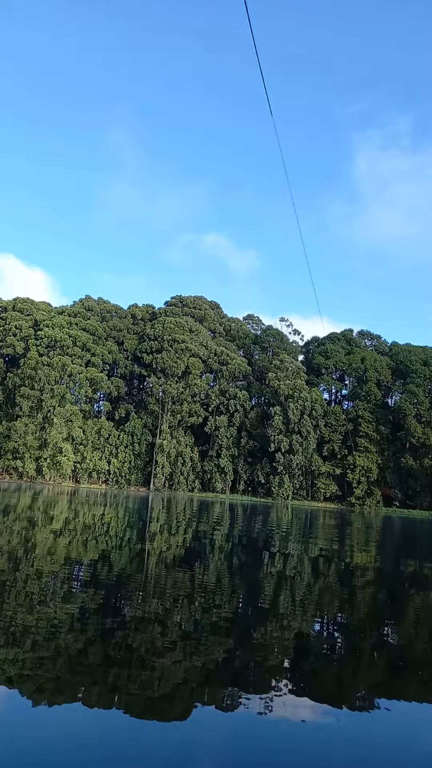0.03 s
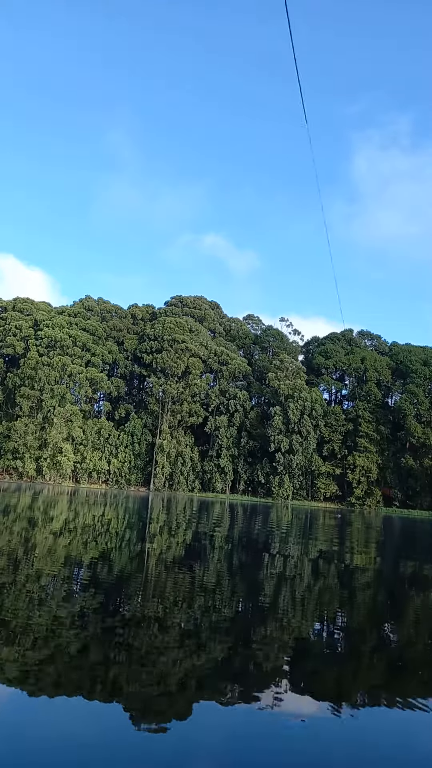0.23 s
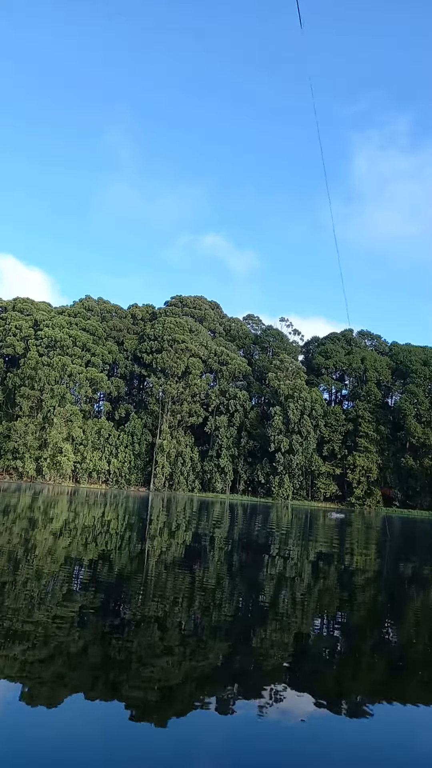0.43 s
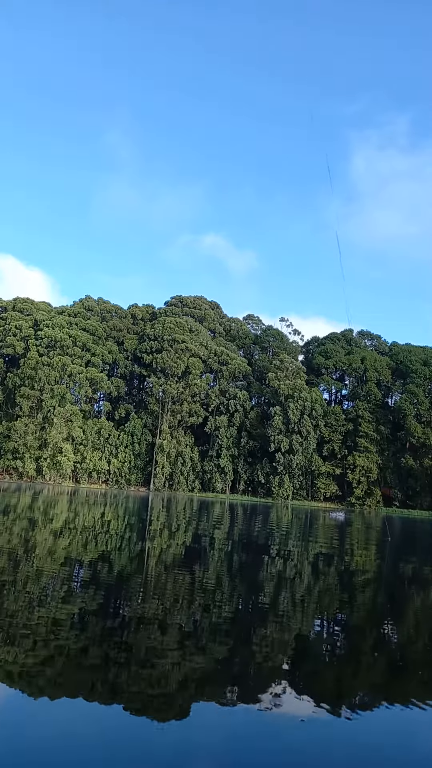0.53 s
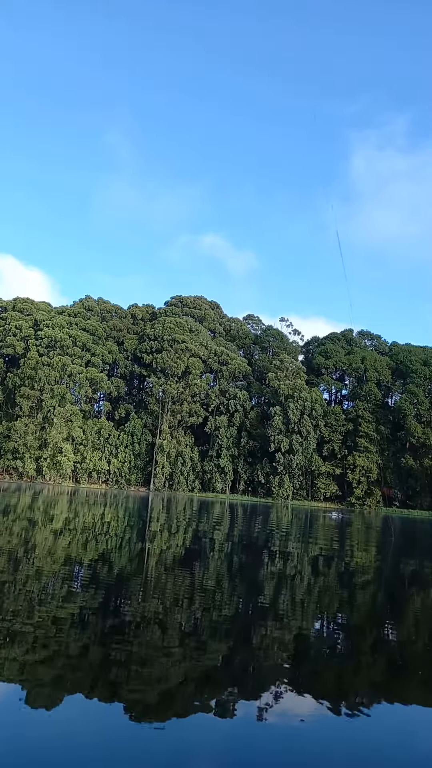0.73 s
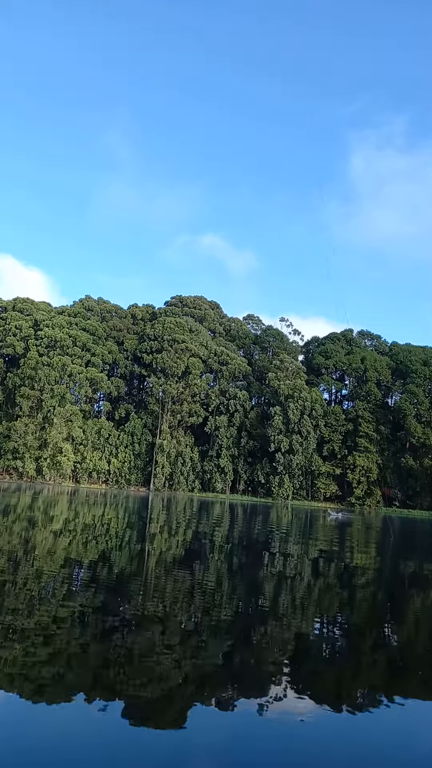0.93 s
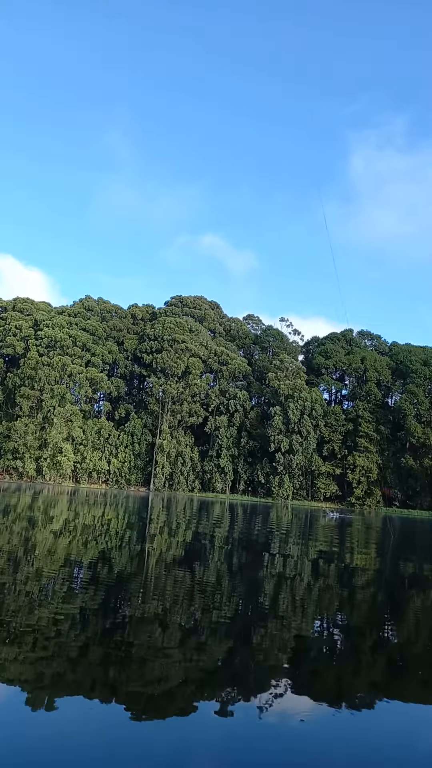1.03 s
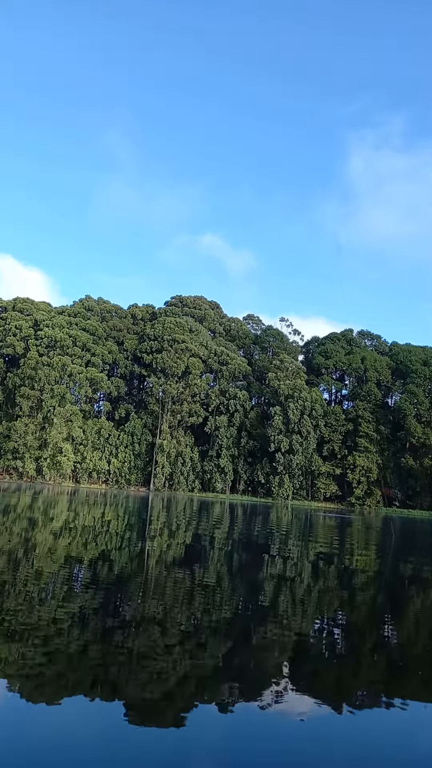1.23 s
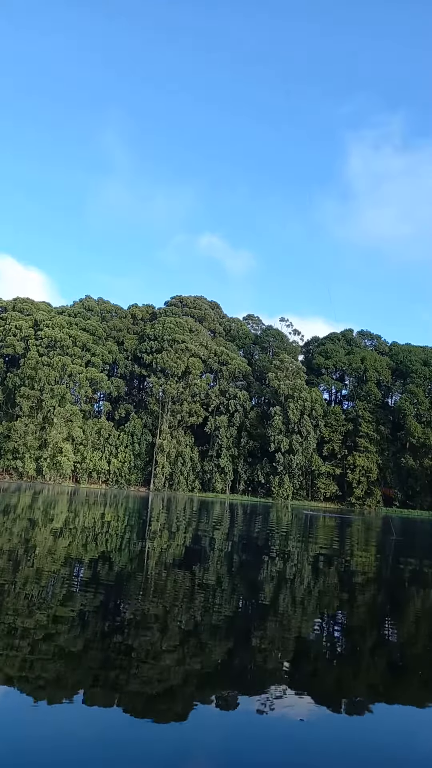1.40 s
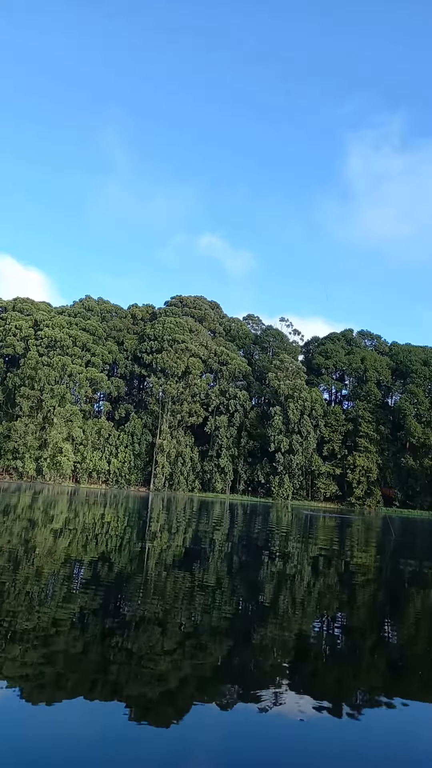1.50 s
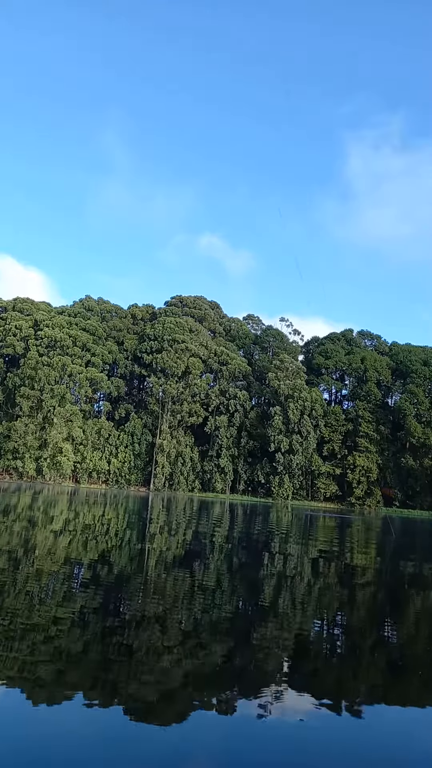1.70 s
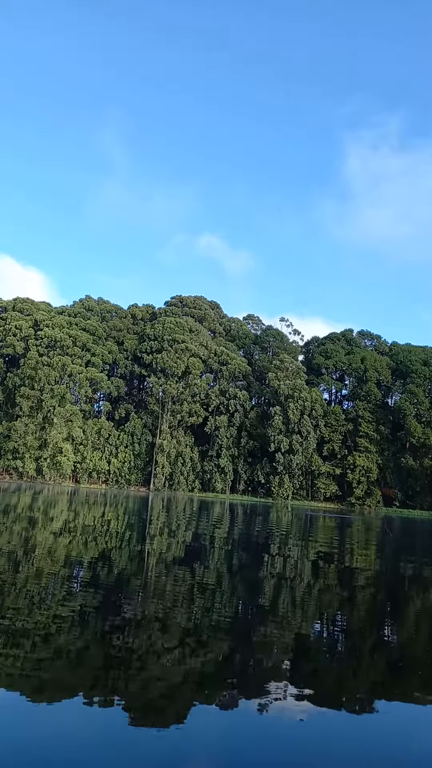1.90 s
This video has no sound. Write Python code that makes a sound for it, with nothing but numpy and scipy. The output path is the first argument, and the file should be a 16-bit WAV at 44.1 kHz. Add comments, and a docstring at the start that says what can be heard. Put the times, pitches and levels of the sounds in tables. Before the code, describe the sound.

Fishing line runs off a reel with a ratcheting whir that winds down into ticks.

```python
"""A fishing line ticks faintly as it tightens, then the reel bursts into a hissing whir: a cast over a lake.
The pawl strikes the spool's teeth so fast that the impacts fuse, exciting the resonances of the reel; they
separate into single ticks as the spool runs down, and two more teeth slip later. The line swishes through the
guides, a brief falling tone rides on the whir, the spinning spool shakes the rod, and the far bank returns a
dull echo. Behind it lie a soft wash over the water and the low rumble and thin hiss of the air."""
import sys
import numpy as np
from scipy import signal
from scipy.fft import rfft, irfft, next_fast_len
from scipy.io import wavfile
from scipy.ndimage import uniform_filter1d

SR = 44100
rng = np.random.default_rng(int(sys.argv[2]) if len(sys.argv) > 2 else 0)


def write(x):
    x = np.atleast_2d(x).T
    wavfile.write(sys.argv[1], SR, np.round(np.clip(x, -1, 1) * 32767).astype(np.int16))


N = 85995
TIME = np.arange(N) / SR
FFT_SIZE = next_fast_len(2 * N)
HZ = np.maximum(np.arange(FFT_SIZE // 2 + 1) * SR / FFT_SIZE, 1)
ARRIVAL_S = np.array([[0], [0.0004863]])   # left, right: the reel's sound reaches the right side later


# Transfer function of the reel: f/Hz, left gain/dB, right gain/dB
REEL_RESPONSE = [(295, -29.5, -37.5), (1448, -29, -24), (1970, -17.5, -17.5), (2426, -16, -15.5),
                 (3240, -12.5, -10.5), (3590, 1.5, 0.5), (3885, -0.5, -0.5), (4590, -0.5, -1),
                 (4770, -5, -0.5), (5200, -9, -2), (5640, -4.5, 0.5), (6580, -3.5, -3.5), (7030, -15, -24),
                 (8150, -11.5, -4), (8990, -12.5, -18.5), (11320, 0, -1), (11600, -1, 4.5), (11780, 4.5, 2),
                 (12100, 9, -1.5), (13700, 3, -3.5), (13800, -0.5, -1.5), (14200, 2, 6.5), (15100, 3.5, -4),
                 (15600, 8, -8.5)]
# Normal modes of spool and frame: f/Hz, gain/dB, T60/s
REEL_MODES = [(2330, -2, .08), (3531, -9, .08), (4290, 3, .028), (5120, 3, .018), (5950, 2, .025),
              (8440, -4, .22), (11860, -10, .15), (13800, -5, .016), (14700, -4, .008)]

def reel(body_db=10.0, scatter_s=.0007, scatter_above_hz=3290, shore_t60_s=.33):
    """Forced vibration: the pawl drives damped modes, heard directly and by short reflected paths."""
    modes = 1 + sum(from_db(db) / (1 + 2j * np.pi * (HZ - hz) * t60 / np.log(1000))
                    for hz, db, t60 in REEL_MODES)
    body = modes * minimum_phase(in_hz(REEL_RESPONSE))
    treble = 1 / (1 + (scatter_above_hz / np.maximum(HZ, 100)) ** 20)
    scatter = from_db(-7) * diffuse(TIME * np.exp(-TIME / scatter_s)) * treble   # off rod and hand
    shore = from_db(-32) * diffuse(from_db(-60 * TIME / shore_t60_s))
    return from_db(body_db) * filtered(pawl(), body * (delay(ARRIVAL_S) + scatter + shore))


# Single teeth at low speed: t/s, relative level/dB in four rising bands, left minus right/dB
SLOW_TEETH = [(.2290, -42, -37, -36, -35, 0), (.2362, -40, -36, -38, -38, 0),
              (.2414, -35, -33, -34, -33, 0), (.8692, -33, -31, -31, -31, 0),
              (.8772, -34, -33, -32, -32, 0), (.8857, -33, -33, -34, -34, 0),
              (.8951, -34, -33, -33, -33, 0), (.905, -35, -33, -35, -34, 0), (.9163, -37, -35, -34, -33, 0),
              (.9303, -37, -35, -36, -36, 0), (.9471, -37, -35, -36, -36, 0),
              (.9694, -38, -37, -37, -35, 0), (.9993, -40, -39, -37, -37, 0),
              (1.4601, -50, -43, -49, -44, -6), (1.8891, -44, -41, -47, -43, 2)]
BAND_EDGES_HZ = (4750, 7300, 12800)
FAST_STRIKE_SHARE, SLOW_STRIKE_SHARE = (.5, .33, .45, .3), .65   # energy in the clean strike; fast: by band
CHATTER_CORRELATION = (.9, .75, .72, .72)   # left with right, by band
REBOUND_DELAYS_S, REBOUND_FEEDBACK = (.00013, .00021, .00034, .00055), .55

def pawl(rise_s=.0007, decay_s=.0009, rattle_s=.0033, rattle_db=-13, slow_gain_db=2.5):
    """Impact excitation: each tooth's energy divides between a rebounding strike and contact chatter."""
    age = np.maximum(TIME - rise_s, 0)
    decay = np.exp(-2 * age / decay_s) + from_db(rattle_db) ** 2 * np.exp(-2 * age / rattle_s)
    burst = np.minimum(TIME / rise_s, 1) * decay   # power envelope of one tooth's chatter
    rebounds = np.prod([(delay(s) - REBOUND_FEEDBACK) / (1 - REBOUND_FEEDBACK * delay(s))
                        for s in REBOUND_DELAYS_S], axis=0)   # all-pass echoes within the frame
    fast, period_s = fast_teeth()
    times, *levels, pan_db = np.vstack([fast, SLOW_TEETH]).T
    onsets = (times * SR).astype(int)
    # Weighting by the period keeps the power of the whir independent of the tooth rate.
    weight = np.r_[period_s * SR / burst.sum(), np.full(len(SLOW_TEETH), from_db(slow_gain_db) ** 2)]
    lowpasses = [1 / (1 + (HZ / hz) ** 30) for hz in BAND_EDGES_HZ]
    bands = np.diff(lowpasses, axis=0, prepend=0, append=1)
    clicks = 0
    for band, db, fast_share, correlation in zip(bands, levels, FAST_STRIKE_SHARE, CHATTER_CORRELATION):
        energy = weight * from_db(db) ** 2
        share = np.r_[np.full(len(fast), fast_share), np.full(len(SLOW_TEETH), SLOW_STRIKE_SHARE)]
        strike_energy = burst.sum() * np.bincount(onsets, energy * share, N)
        strikes = filtered(np.sqrt(strike_energy), rebounds)
        chatter_power = filtered(np.bincount(onsets, energy * (1 - share), N), rfft(burst, FFT_SIZE))
        chatter = contacts(correlation) * np.sqrt(np.maximum(chatter_power, 0))
        clicks = clicks + filtered(strikes + chatter, band)
    balance_db = in_time(sorted(zip(times, pan_db)))[0]
    return clicks * from_db(balance_db * [[.5], [-.5]])


# Tooth-passing frequency of the spool: t/s, f/Hz
TOOTH_RATE = [(.242, 215), (.25, 250), (.262, 360), (.28, 447), (.31, 465), (.358, 583), (.372, 560),
              (.385, 643), (.408, 640), (.432, 530), (.46, 421), (.49, 358), (.55, 301), (.58, 307),
              (.635, 350), (.7, 340), (.81, 313), (.825, 240), (.87, 135)]
# Envelope of the whir: t/s, relative level/dB in the four bands
WHIR_LEVELS = [(0.245, -35.5, -35.5, -42, -34.5), (0.257, -34, -33, -33, -33.5),
               (0.307, -31.5, -35, -29.5, -27), (0.365, -30, -35, -32, -28.5),
               (0.381, -38, -30.5, -28.5, -30.5), (0.389, -32.5, -37, -28.5, -28),
               (0.477, -33, -38, -33, -36), (0.491, -30.5, -36.5, -31, -32),
               (0.505, -35.5, -40.5, -33.5, -33.5), (0.543, -34, -36, -28.5, -34),
               (0.555, -33, -33.5, -33, -39), (0.569, -39, -38.5, -31.5, -32.5),
               (0.619, -32.5, -38.5, -28.5, -33.5), (0.649, -38, -37, -30, -33),
               (0.691, -35.5, -36, -29, -37), (0.699, -34, -35, -35, -29), (0.717, -40, -35.5, -30.5, -33),
               (0.771, -33.5, -38, -32, -34.5), (0.841, -42, -42.5, -37, -36.5), (0.86, -44, -40, -36, -43)]

def fast_teeth(band_gains_db=(2, 4, 0, -1), jitter_s=.000014, spread_db=1):
    """Integrating the tooth rate times the impacts; returns rows like SLOW_TEETH, and their periods."""
    t = TIME[(TIME >= TOOTH_RATE[0][0]) & (TIME <= TOOTH_RATE[-1][0])]
    teeth_passed = np.cumsum(in_time(TOOTH_RATE, t)[0]) / SR
    times = np.interp(np.arange(1, teeth_passed[-1] - .5), teeth_passed, t)
    lateness, weakness = rng.standard_normal((len(times), 2)).T
    levels = [db + gain_db - spread_db * weakness
              for db, gain_db in zip(in_time(WHIR_LEVELS, times), band_gains_db)]
    rows = np.transpose([times + jitter_s * lateness, *levels, np.zeros_like(times)])
    return rows, 1 / in_time(TOOTH_RATE, times)[0]


def contacts(correlation, grain_db=3):
    """Superposition of tiny metal contacts: stereo noise of rms 1, its level redrawn every 8 samples."""
    common = np.sqrt(correlation) * rng.standard_normal(N)
    separate = np.sqrt(1 - correlation) * rng.standard_normal((2, N))
    grains = (common + separate) * from_db(grain_db * np.repeat(rng.standard_normal(N), 8)[:N])
    return grains / grains.std()


# Tone of the spool near top speed: t/s, f/Hz, level/dB
WHISTLE = [(.375, 4450, -65), (.39, 4520, -30), (.41, 4500, -29), (.425, 4300, -32), (.445, 4200, -38),
           (.46, 4150, -75)]

def spool_whistle(waver_hz=57.8):
    """Random frequency modulation: a brief, wavering tone glides down near 4.5 kHz, riding high on the whir at
    top speed."""
    hz, db = in_time(WHISTLE)
    waver = uniform_filter1d(rng.standard_normal(N), size=200)
    phase = 2 * np.pi * np.cumsum(hz + waver_hz * waver / waver.std()) / SR
    tone = from_db(db) * np.sin(phase) * during(WHISTLE)
    return filtered(tone, delay(ARRIVAL_S))


# Ticks of the tightening line, and its faint slide: t/s, level/dB
TENSION_TICKS = [(.1085, -70.5), (.1372, -54.5), (.1508, -55.5), (.162, -58.5), (.1725, -57.5)]
SLIDE_LEVEL = [(.13, -89.5), (.18, -68), (.225, -67.5), (.24, -93)]
# Spectrum of both: f/Hz, relative level/dB
TENSION_SPECTRUM = [(4000, -25), (9000, -18.5), (12000, 7), (15000, -1)]
# Line running through the guides: t/s, level/dB
SWISH_LEVEL = [(.22, -94), (.27, -69), (.3, -42), (.33, -51.5), (.41, -49), (.48, -67.5), (.7, -64.5),
               (.8, -81), (.87, -57.5), (.95, -80), (1.05, -100)]
# Its spectrum: f/Hz, relative level/dB
SWISH_SPECTRUM = [(60, -15), (130, -2), (300, -7), (600, 5.5), (1100, 2.5), (2000, 9.5), (3500, -36),
                  (8000, -29)]

def line():
    """Friction noise: the line ticks and slides under tension, then swishes out through the guides."""
    ticks = pulses(TENSION_TICKS, rise_s=.0005)
    slide = envelope(SLIDE_LEVEL) * during(SLIDE_LEVEL)
    creak = (ticks + slide) * noise(TENSION_SPECTRUM, correlation=.087)
    return creak + envelope(SWISH_LEVEL) * noise(SWISH_SPECTRUM, correlation=.24)


# Bumps of the rod in the hand: t/s, level/dB
ROD_BUMPS = [(.845, -53), (.9, -64)]
# Spectra of the bumps and of the shaking rod: f/Hz, relative level/dB
BUMP_SPECTRUM = [(100, -5), (300, -6), (650, 2.5), (1200, -9)]
SHAKE_SPECTRUM = [(25, -37), (60, -2.5), (110, 6), (200, -19), (330, 3), (700, -28.5), (3000, -63.5)]

def rod(shake_db=-66.5):
    """Structure-borne sound: the spinning spool shakes the rod, which bumps twice as the spool slows."""
    spinning = uniform_filter1d(1.0 * during(TOOTH_RATE), size=2000)
    shake = from_db(shake_db) * spinning * noise(SHAKE_SPECTRUM, correlation=.93)
    return shake + pulses(ROD_BUMPS, rise_s=.0064) * noise(BUMP_SPECTRUM, correlation=.98)


# Reflection from the far bank: f/Hz, gain/dB
BANK_RESPONSE = [(300, -6.5), (1400, -5), (2300, -11), (4000, -39.5), (8000, -46), (15000, -61.5)]

def bank_echo(sound, t60_s=1):
    """Diffuse reflection: the trees around the lake return a dull, exponentially decaying echo."""
    tail = diffuse(from_db(-60 * TIME / t60_s))
    return filtered(sound, from_db(in_hz(BANK_RESPONSE)) * tail)


# Wash over the water: t/s, level/dB
WASH_LEVEL = [(.85, -100), (1.02, -72), (1.22, -75), (1.5, -94)]
# Its spectrum: f/Hz, relative level/dB
WASH_SPECTRUM = [(250, -22), (560, 4), (900, -6), (1450, 0.5), (2200, -20.5), (5000, -45)]

def wash():
    """Amplitude-modulated noise: a soft, distant wash swells and fades after the cast."""
    return envelope(WASH_LEVEL) * noise(WASH_SPECTRUM, correlation=.6)


# Ambient noise: t/s, level/dB
AIR_ENVELOPE = [(0, -63.5), (.25, -62), (1.0, -67.5), (1.3, -69.5), (1.6, -69), (1.95, -68)]
# Its spectral density: f/Hz, relative level/dB
AIR_SPECTRUM = [(25, -32.5), (50, -6.5), (88, 1), (135, -1.5), (170, -10), (330, -10.5), (600, -10.5),
                (1000, -12), (1400, -16), (1900, -18), (2400, -15.5), (3400, -24.5), (4400, -18.5),
                (4900, -6.5), (5300, -16.5), (5900, -15.5), (6700, -21), (7400, -41.5), (15000, -32.5)]
# Its likeness between left and right: f/Hz, correlation coefficient
AIR_CORRELATION = [(40, 0.097), (100, 0.92), (250, 0.9), (600, 0.71), (5000, 0)]

def air(hum_hz=128, hum_rms_db=-79.5):
    """A partly coherent field: low rumble largely common to both sides, a wide hiss and a faint hum."""
    hum = from_db(hum_rms_db) * np.sqrt(2) * np.sin(2 * np.pi * hum_hz * TIME)
    return envelope(AIR_ENVELOPE) * noise(AIR_SPECTRUM, in_hz(AIR_CORRELATION)[0]) + hum


def from_db(db):
    """Amplitude ratio of a level in decibels."""
    return 10 ** (np.asarray(db) / 20)


def in_time(rows, t=TIME):
    """Linear interpolation of a table's columns at the times t."""
    times, *columns = np.transpose(rows)
    return [np.interp(t, times, column) for column in columns]


def in_hz(rows):
    """Interpolation of a table's columns over logarithmic frequency."""
    hz, *columns = np.transpose(rows)
    return np.array([np.interp(np.log(HZ), np.log(hz), column) for column in columns])


def envelope(rows):
    """Amplitude envelope of a level curve."""
    return from_db(in_time(rows)[0])


def during(rows):
    """Rectangular window from a table's first time to its last."""
    return (TIME > rows[0][0]) & (TIME < rows[-1][0])


def pulses(rows, rise_s):
    """Critically damped envelopes, each peaking rise_s after its onset."""
    ages = [(np.maximum(TIME - onset, 0) / rise_s, db) for onset, db in rows]
    return sum(from_db(db) * age * np.exp(1 - age) for age, db in ages)


def filtered(x, response):
    """Convolution as a product of spectra."""
    return irfft(rfft(x, FFT_SIZE) * response, FFT_SIZE)[..., :N]


def delay(seconds):
    """Linear phase response of a pure delay."""
    return np.exp(-2j * np.pi * HZ * seconds)


def minimum_phase(db):
    """Causal response with these gains, by folding the cepstrum."""
    cepstrum = irfft(np.log(from_db(db)), FFT_SIZE)
    cepstrum[..., 1:FFT_SIZE // 2] *= 2
    cepstrum[..., FFT_SIZE // 2 + 1:] = 0
    return np.exp(rfft(cepstrum))


def noise(spectrum, correlation):
    """Coloured stereo noise of rms 1; the ratio of mid to side sets the correlation."""
    gain = from_db(in_hz(spectrum)[0])
    mid = filtered(rng.standard_normal(N), gain * np.sqrt(1 + correlation))
    side = filtered(rng.standard_normal(N), gain * np.sqrt(1 - correlation))
    stereo = np.array([mid + side, mid - side])
    return stereo / stereo.std()


def diffuse(decay):
    """Frequency response of dense random reflections, independent on each side, of unit energy."""
    reflections = rng.standard_normal((2, N)) * decay
    return rfft(reflections / np.linalg.norm(reflections, axis=1, keepdims=True), FFT_SIZE)


def scene():
    """Superposition of the nearby tackle, its echo and the lake's background."""
    cast = reel() + spool_whistle() + line() + rod()
    return cast + bank_echo(cast) + wash() + air()


def record(dry):
    """Band limiting: an elliptic low-pass cuts steeply above 15750 Hz."""
    return signal.sosfilt(signal.ellip(12, .1, 80, 15750, fs=SR, output="sos"), dry)


dry = scene()
out = record(dry)
write(out)
```